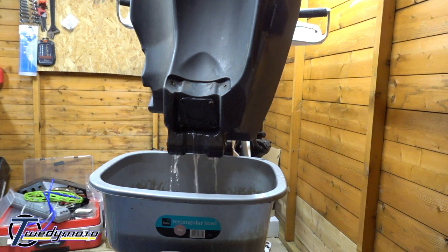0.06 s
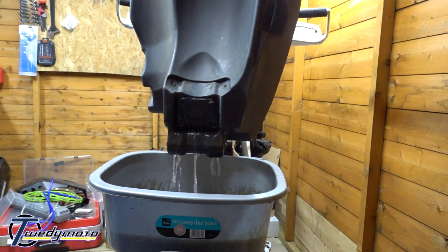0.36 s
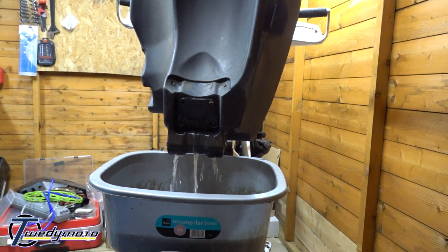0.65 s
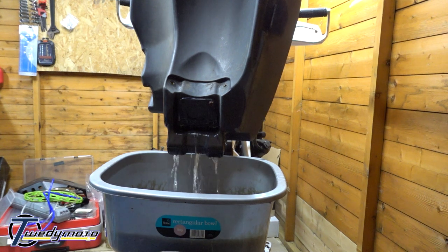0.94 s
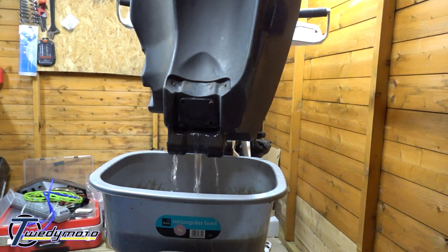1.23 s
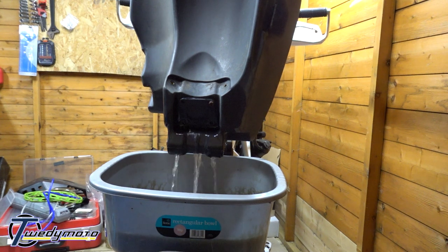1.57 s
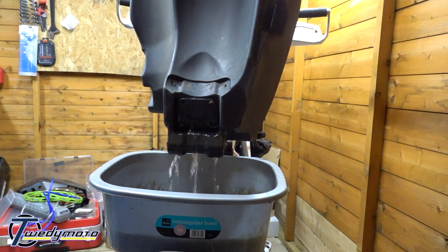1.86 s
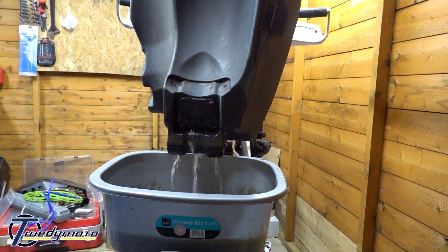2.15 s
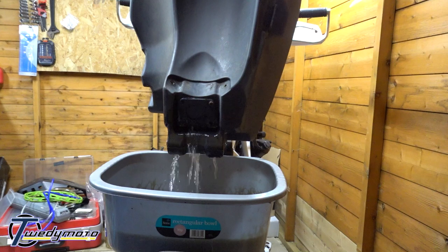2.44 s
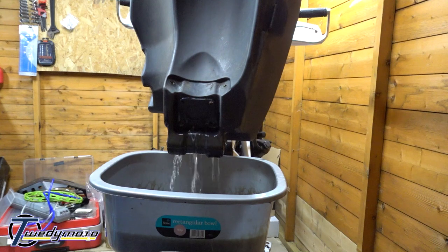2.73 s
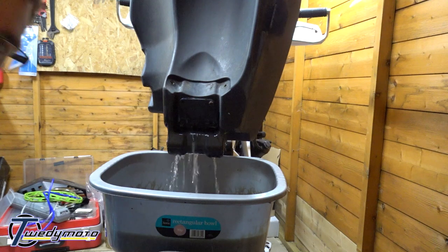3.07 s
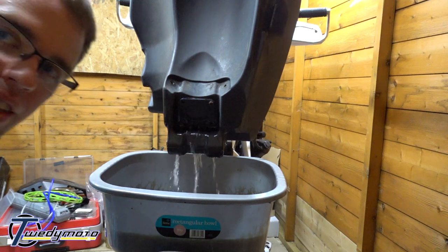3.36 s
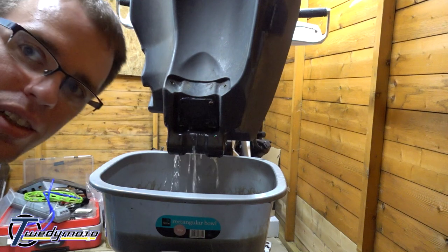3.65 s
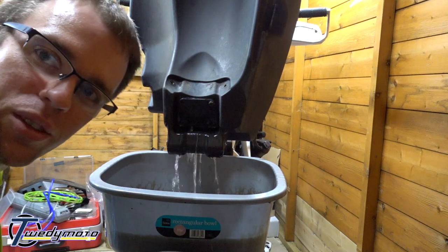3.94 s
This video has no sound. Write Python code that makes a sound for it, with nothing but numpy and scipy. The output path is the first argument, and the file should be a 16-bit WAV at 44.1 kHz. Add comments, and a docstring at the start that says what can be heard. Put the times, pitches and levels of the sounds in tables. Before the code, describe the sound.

Liquid trickles steadily into a plastic tub, with bubbly drips and fine splashing.

```python
"""Trickle into a plastic tub

Thin streams of liquid fall from a tank into a part-filled plastic tub in a wooden shed.
Drops smack the surface and trap bubbles that ring briefly and rise in pitch. Sharp spatters,
tiny bubbles and fine spray fill the gaps. The tub's hollow and the close plank walls ring
after them, over a low electrical hum."""
import sys
import numpy as np
from scipy import signal
from scipy.fft import rfft, irfft
from scipy.io import wavfile

SR = 44100
rng = np.random.default_rng(int(sys.argv[2]) if len(sys.argv) > 2 else 0)


def store_pcm(level_fs):
    """Save levels as 16-bit WAV."""
    pcm = np.round(np.clip(level_fs, -1, 1) * 32767).astype(np.int16)
    wavfile.write(sys.argv[1], SR, np.atleast_2d(pcm).T)


N = 176400

# steady electrical hum: (pitch [Hz], average level [dB])
HUM_TONES = [(100.1, -63.5), (200.2, -81.5)]
# tone of the quiet air: (frequency [Hz], gain [dB])
AIR_TONE = [(20, -16), (55, -9.5), (100, 2.5), (180, -8), (400, -5), (1000, -14.5), (8000, -25)]
# how alike both ears hear scattered sound, 1 or more is identical: (frequency [Hz], likeness [ratio])
EAR_LIKENESS = [(60, 1.2), (250, 0.65), (1200, 0.6), (2200, 0.87), (4000, 0.5), (7000, 0.13),
                (15000, -0.12)]
# how much louder the liquid is on the left: (frequency [Hz], left over right [dB])
LEFT_BIAS = [(250, .2), (1000, 1.1), (2200, 1.5), (8000, 2.4)]
# first echoes off the tub's sides and the nearest wall: (delay [s], gain [dB])
FIRST_ECHOES = [(.0036, -5), (0.0113, -12.5), (0.017, -59)]
# tone of the shed's fading echo: (frequency [Hz], gain [dB])
SHED_TONE = [(200, 1.5), (900, 3), (1700, 0), (3200, -4), (6000, -1.5), (14000, -4.5)]
# length of that echo: (frequency [Hz], time to fade by 60 dB [s])
SHED_FADE = [(200, 0.53), (1500, 0.15), (4000, 0.19), (14000, 0.063)]
# notes of the air in the tub: (pitch [Hz], gain [dB], time to fade by 60 dB [s])
TUB_NOTES = [(425, -3, .15), (697, 0, .22), (838, 6, .17), (1055, -3, .17), (1243, 2, .19), (1738, 7, .22),
             (2662, -5, .15), (2752, -3, .15), (3230, -7, .12)]
# dull knocks on the plastic: (time [s], pitch [Hz], level [dB])
TUB_KNOCKS = [(.797, 75, -47), (0.8, 280, -55), (3.501, 450, -49.5)]
# slow course of the fine splashing: (time [s], level [dB])
FLOW_LEVEL = [(0, -43), (.3, -43.5), (.65, -44), (1.1, -47), (1.5, -45.5), (1.75, -44.5), (2.1, -46),
              (2.8, -45.5), (3.45, -44.5), (4.0, -47)]
# moments when the streams thin out: (time [s], dip [dB])
FLOW_LULLS = [(.51, 2.5), (1.535, 2.5), (2.015, 5), (2.555, 5), (3.717, 4.5)]
# tone of the fine spray: (frequency [Hz], gain [dB])
SPRAY_TONE = [(300, -38), (700, -32), (1300, -15), (3000, -3), (6000, -0.5), (10000, -3), (16000, -8)]
# sharp spatters of droplets: (time [s], centre pitch [Hz], level [dB])
DROP_SPATTERS = [(0.1974, 8920, -39.5), (0.2206, 9230, -46), (0.2894, 9200, -39.0), (0.2939, 5700, -35),
                 (0.3174, 9400, -38), (0.3434, 9100, -38.9), (0.3894, 6200, -31.8), (0.513, 11200, -41),
                 (0.607, 6800, -36), (0.6139, 14500, -41), (0.709, 8600, -36.5), (0.752, 9000, -35),
                 (0.8067, 5300, -36.5), (0.842, 6400, -33), (0.875, 8100, -42), (0.9614, 13000, -39.5),
                 (1.2024, 5700, -35), (1.2537, 5450, -36), (1.4026, 6000, -38), (1.4313, 7600, -35.1),
                 (1.5739, 6700, -34.5), (1.592, 6310, -46), (1.6797, 4580, -34.5), (1.6813, 8030, -31),
                 (1.7286, 6760, -37), (1.7335, 9800, -42.5), (1.7872, 11900, -39.5), (1.7883, 6900, -41),
                 (1.8859, 7350, -35.2), (2.0293, 6340, -37), (2.0753, 4870, -39), (2.2269, 5530, -34.5),
                 (2.2285, 12800, -40), (2.2438, 5800, -35.1), (2.2868, 4800, -36.5), (2.3466, 5400, -30.5),
                 (2.3481, 10900, -43.3), (2.4146, 6900, -36), (2.487, 5600, -37), (2.7666, 7500, -42.5),
                 (3.032, 5960, -37.5), (3.0469, 14500, -39), (3.0672, 5690, -36.5), (3.1233, 9560, -40),
                 (3.1216, 14000, -50), (3.1546, 5260, -32.5), (3.3762, 5690, -33.5), (3.4532, 12000, -41),
                 (3.509, 9200, -34.5), (3.6637, 12000, -40.5), (3.7288, 8000, -36), (3.7564, 7150, -33),
                 (3.977, 12000, -40)]
# typical strength of the small bubbles: (pitch [Hz], level [dB])
SMALL_BUBBLE_LEVEL = [(1100, -53), (1700, -51), (3000, -42), (5000, -45), (8000, -45.5), (12000, -59),
                      (15500, -71)]
# large drops that each trap a clear bubble: (time [s], pitch [Hz], base level [dB])
LARGE_DROPS = [(0.098, 3230, -28), (0.1137, 3210, -29), (0.1237, 2040, -35), (0.1423, 1210, -40.5),
               (0.1894, 3200, -21.5), (0.2, 1313, -34.5), (0.2381, 1810, -31), (0.242, 2810, -28),
               (0.3013, 1950, -34), (0.303, 3130, -25.5), (0.3232, 1395, -29.5), (0.333, 882, -44),
               (0.3761, 1760, -30), (0.405, 430, -53), (0.4278, 4480, -34), (0.438, 1296, -32.5),
               (0.5657, 3270, -22), (0.5774, 4600, -34.5), (0.588, 460, -50.5), (0.628, 865, -45),
               (0.638, 3800, -29.5), (0.6555, 710, -44), (0.7099, 1150, -46), (0.7308, 825, -43.5),
               (0.7533, 1440, -38), (0.7618, 2020, -31.5), (0.773, 2790, -27.5), (0.7965, 1300, -37.5),
               (0.8072, 1750, -39.5), (0.8396, 1070, -38.5), (0.845, 3300, -27), (0.8525, 1097, -38.5),
               (0.8738, 4180, -27), (0.9155, 3680, -23.5), (0.9586, 3610, -30.5), (0.9827, 1235, -38),
               (0.9873, 850, -40.5), (0.987, 3150, -25), (1.04, 870, -43), (1.0581, 2800, -30),
               (1.0796, 1860, -28.5), (1.102, 2480, -33), (1.121, 3680, -32), (1.1417, 3035, -22),
               (1.161, 1127, -38), (1.1731, 3220, -24), (1.1883, 1043, -38.5), (1.2003, 2310, -29.5),
               (1.2194, 3090, -22), (1.243, 1910, -29.5), (1.315, 907, -42.5), (1.3338, 1175, -40),
               (1.3724, 1820, -30.5), (1.3731, 1080, -41.5), (1.4198, 3260, -31.5), (1.4223, 1880, -37),
               (1.433, 1290, -34), (1.4437, 1990, -30.5), (1.5649, 3240, -36), (1.6392, 1230, -59),
               (1.6002, 3260, -23), (1.601, 1268, -33.5), (1.6007, 1845, -25.5), (1.609, 1667, -29.5),
               (1.6963, 1160, -38), (1.7963, 3080, -19), (1.817, 2400, -31), (1.9057, 1740, -35),
               (1.9336, 3130, -27.5), (2.0424, 3200, -30), (2.0755, 3300, -29), (2.0982, 2830, -25.5),
               (2.1172, 835, -40), (2.134, 1270, -37.5), (2.1443, 2180, -29), (2.1501, 1780, -28.5),
               (2.1904, 4300, -38.5), (2.1978, 3170, -35), (2.2793, 1350, -39.5), (2.3805, 3300, -30),
               (2.3953, 2650, -28), (2.407, 1880, -32.5), (2.425, 1060, -45.5), (2.435, 3160, -32),
               (2.495, 1780, -41), (2.501, 2960, -33.5), (2.5682, 1794, -35.5), (2.633, 2960, -47),
               (2.647, 2770, -25.5), (2.68, 1294, -47.5), (2.7293, 1227, -45.5), (2.781, 2650, -24.5),
               (2.8361, 3520, -32), (2.8425, 1710, -45.5), (2.8931, 1255, -35), (2.8969, 1880, -30),
               (2.9298, 4300, -37), (3.0022, 3120, -33), (3.0312, 2000, -30.5), (3.0635, 1950, -29),
               (3.068, 3140, -26.5), (3.1818, 2010, -33.5), (3.1822, 3280, -30), (3.2074, 1250, -37.5),
               (3.2257, 1750, -38.5), (3.2586, 1550, -40), (3.2935, 3730, -39.5), (3.3468, 3795, -30),
               (3.3609, 3320, -45), (3.381, 3350, -28.5), (3.4296, 3900, -32), (3.4611, 3450, -28),
               (3.4861, 4490, -31), (3.4875, 2780, -29), (3.587, 4200, -36), (3.6079, 3010, -27.5),
               (3.63, 1840, -34), (3.7632, 1242, -32.5), (3.813, 1620, -36), (3.8247, 2050, -36),
               (3.8266, 2780, -25.5), (3.8946, 3400, -31.5), (3.955, 3140, -25), (3.96, 1286, -40.5),
               (3.9899, 3550, -25.5)]
# boost added to that base level for the bubble's note: (pitch [Hz], gain [dB])
NOTE_BOOST = [(450, 2.5), (850, 0.5), (1200, 2.5), (1700, 0), (3200, 0.7), (7000, 18.5)]

STREAMS = 4   # landing spots in the tub
EAR_LAG_S = .00003   # typical delay between the ears, as drops land in different places


def from_db(db):
    """Turn decibels into a number to multiply by."""
    return 10 ** (np.asarray(db) / 20)


def unit_level(x):
    """Scale a sound so its average (rms) level is 1."""
    return x / np.sqrt(np.mean(x ** 2) + 1e-20)


def at_hz(points, hz):
    """Read between a table's rows, giving each octave equal room."""
    freqs, values = np.transpose(points)
    return np.interp(np.log(np.maximum(hz, 1)), np.log(freqs), values)


def colour(x, points):
    """Turn lows and highs up or down by a table of (frequency [Hz], gain [dB])."""
    size = 2 * x.shape[-1]
    gain = from_db(at_hz(points, np.fft.rfftfreq(size, 1 / SR)))
    return irfft(rfft(x, size) * gain)[..., :size // 2]


def drift(per_s):
    """Glide to a new random value per_s times a second."""
    targets = rng.standard_normal(N // 100)
    return np.interp(np.arange(N) / SR * per_s, np.arange(len(targets)), targets)


def diffuse(pair):
    """Mix two unrelated sounds into left and right, alike in the bass and unlike in the treble."""
    size = pair.shape[-1]
    alike = np.clip(at_hz(EAR_LIKENESS, np.fft.rfftfreq(size, 1 / SR)), -1, 1)
    mid, side = rfft(pair)
    return irfft(np.sqrt((1 + alike) / 2) * mid + np.sqrt((1 - alike) / 2) * side * [[1], [-1]], size)


def add(out, start_s, sound):
    """Mix a short sound in at the given time."""
    i = int(np.clip(start_s * SR, 0, N - 1))
    out[:, i:i + sound.shape[-1]] += sound[..., :N - i]


def background(drone_hz=115.4, drone_db=-67, air_db=-64.5):
    """Electrical hum, a wavering low tone and quiet air."""
    t = np.arange(N) / SR
    hum = sum(from_db(db) * np.sqrt(2) * np.sin(2 * np.pi * hz * t) for hz, db in HUM_TONES)
    waver = drift(per_s=14.2) + 1j * drift(per_s=14.2)   # shakes both loudness and pitch
    drone = np.real(waver * np.exp(2j * np.pi * drone_hz * t))
    air = colour(diffuse(rng.standard_normal((2, N))), AIR_TONE)
    return hum + from_db(drone_db) * unit_level(drone) + from_db(air_db) * unit_level(air)


def shed_echo(x, onset_s=.005, spread_s=.001):
    """Close surfaces throw back a few echoes, then a short blur that lasts longest in the bass."""
    t = np.arange(SR // 3) / SR
    hz = np.fft.rfftfreq(len(t), 1 / SR)
    noise = rfft(diffuse(rng.standard_normal((2, len(t)))))
    edges_hz = np.geomspace(150, 20000, 13)
    onset = 1 - np.exp(-(t / onset_s) ** 2)
    response = np.zeros((2, len(t)))   # how the shed answers one click
    for low, high in zip(edges_hz, edges_hz[1:]):
        centre = np.sqrt(low * high)
        band = irfft(noise * (hz >= low) * (hz < high), len(t))
        fade = onset * from_db(-60 * t / at_hz(SHED_FADE, centre))
        response += from_db(at_hz(SHED_TONE, centre)) * band * fade / np.sqrt(np.sum(fade ** 2))
    for delay, db in FIRST_ECHOES:
        arrival = delay + spread_s * rng.uniform(-1.027, 1) + EAR_LAG_S * rng.standard_normal(2)
        response[[0, 1], (arrival * SR).astype(int)] += from_db(db)
    return signal.fftconvolve(x, response, axes=1)[:, :N]


def tub_ring(x, gain_db=6):
    """The air in the tub's hollow rings on at its own pitches."""
    mono = x.mean(axis=0) + 1e-18
    out = 0
    for hz, db, fade_s in TUB_NOTES:
        kept = from_db(-60 / (fade_s * SR))   # share of the ring left after each sample
        angle = 2 * np.pi * hz / SR
        feedback = [1, -2 * kept * np.cos(angle), kept * kept]
        out += from_db(db) * signal.lfilter([0, 2 * (1 - kept) * np.sin(angle)], feedback, mono)
    return from_db(gain_db) * out


def knocks(decay_s=.0042):
    """Dull bumps on the plastic that die almost at once."""
    out, t = np.zeros((2, N)), np.arange(SR // 10) / SR
    for start_s, hz, db in TUB_KNOCKS:
        add(out, start_s, from_db(db) * np.exp(-t / decay_s) * np.sin(2 * np.pi * hz * t))
    return out


def flow(half_lull_s=.033):
    """Level of the fine splashing in dB: it wanders slowly and dips when the streams thin out."""
    t = np.arange(N) / SR
    dips = sum(db * np.exp(-((t - time_s) / half_lull_s) ** 2) for time_s, db in FLOW_LULLS)
    return np.interp(t, *np.transpose(FLOW_LEVEL)) - dips


def spray(flow_db, gain_db=-3, drops_per_s=2200, spread_db=3, flutter_db=2.2, surge_db=1):
    """Fine droplets patter as dense clicks in fluttering clumps."""
    sizes = from_db(spread_db * np.minimum(rng.exponential(1, (2, N)), 4))
    signs = rng.choice([-1, 1], (2, N))
    hits = rng.random((2, N)) < drops_per_s / SR
    clumps = from_db(flutter_db * drift(per_s=70) + surge_db * drift(per_s=14))
    patter = colour(diffuse(sizes * signs * hits * clumps), SPRAY_TONE)
    return from_db(flow_db + gain_db) * unit_level(patter)


def splash(hz, octaves, decay_s, rise_s=.0005, grain_db=2.5):
    """Liquid breaks up: grainy noise around one pitch, quick to rise and slower to die."""
    t = np.arange(SR // 16) / SR
    grains = rng.standard_normal((2, len(t))) * from_db(grain_db * rng.standard_normal(len(t)))
    edges_hz = np.minimum([hz / 2 ** octaves, hz * 2 ** octaves], [.4 * SR, .45 * SR])
    band = signal.lfilter(*signal.butter(2, edges_hz, "band", fs=SR), grains)
    return unit_level(band) * (1 - np.exp(-t / rise_s)) * np.exp(-t / decay_s)


def bubble(hz, rise_per_swell=.015, wobble_radians=.42):
    """Trapped air pulses: a slightly unsteady note swells and dies while its pitch rises."""
    ear_shift_s = rng.normal() * EAR_LAG_S / 2 * np.array([[1], [-1]])
    wobble = wobble_radians * np.cumsum(rng.standard_normal(11))
    swell_s = .0012 * (2850 / hz) ** .64   # smaller, higher bubbles are quicker
    t = np.maximum(np.arange(int(10 * swell_s * SR)) / SR + ear_shift_s, 0)
    age = t / swell_s   # loudest at age 1
    phase = 2 * np.pi * hz * t * (1 + rise_per_swell * (age / 2 - 1))
    phase += np.interp(age, np.arange(len(wobble)), wobble)
    pulsing = age * np.exp(1 - age) * np.sin(phase)
    # we hear how fast the pulsing changes; dividing keeps the peak near 1
    return np.diff(pulsing) / (2 * np.sin(np.pi * hz / SR))


def spatters(hiss_db=-.8, ping_db=.5, octaves=.27, decay_s=.01, ping_span_s=.02, pings_each=3):
    """A drop shatters: a short hiss and a fading run of pings from tiny bubbles."""
    pings, hisses = np.zeros((2, N)), np.zeros((2, N))
    for start_s, hz, db in DROP_SPATTERS:
        add(hisses, start_s, from_db(db + hiss_db) * splash(hz, octaves, decay_s))
        for late, detune in rng.random((pings_each, 2)):
            lag_s = ping_span_s * late ** 2
            ping = bubble(hz * 2 ** (octaves * (detune - .5)))
            add(pings, start_s + lag_s, from_db(db + ping_db) * np.exp(-lag_s / decay_s) * ping)
    return pings + diffuse(hisses)


def small_bubbles(swing_db, count=4200, per_s=950, spread_db=4.5):
    """Small bubbles form at random, louder when the spray is; one stereo track per stream."""
    out = np.zeros((STREAMS, 2, N))
    starts = np.cumsum(rng.exponential(1, count)) / per_s
    heights = rng.random(count) ** .7   # more high notes than low
    offsets_db = spread_db * np.minimum(rng.standard_normal(count), 2)
    low, high = SMALL_BUBBLE_LEVEL[0][0], SMALL_BUBBLE_LEVEL[-1][0]
    for k, (start_s, height, offset_db) in enumerate(zip(starts, heights, offsets_db)):
        hz = low * (high / low) ** height
        note = bubble(hz)
        if start_s < N / SR:
            db = at_hz(SMALL_BUBBLE_LEVEL, hz) + offset_db + swing_db[int(start_s * SR)]
            add(out[k % STREAMS], start_s, from_db(db) * note)
    return out


def large_drops(splash_db=-8.5, extras=3, extra_db=-12.5, extra_octaves=1.24, extra_span_s=.022):
    """Each drop smacks the surface and traps a clear bubble, which sheds extra, higher ones."""
    out, splashes = np.zeros((STREAMS, 2, N)), np.zeros((2, N))
    for k, (start_s, hz, db) in enumerate(LARGE_DROPS):
        add(out[k % STREAMS], start_s, from_db(db + at_hz(NOTE_BOOST, hz)) * bubble(hz))
        for late, higher in rng.random((extras, 2)):
            extra = from_db(db + extra_db) * bubble(hz * 2 ** (extra_octaves * higher))
            add(out[(k + 1) % STREAMS], start_s + extra_span_s * late, extra)
        smack = splash(hz * 1.12, octaves=.55, decay_s=.005)
        add(splashes, start_s, from_db(db + splash_db) * smack)
    out[0] += diffuse(splashes)
    return out


def scene():
    """The trickle in its tub, a little left of centre, inside the shed."""
    flow_db = flow()
    streams = large_drops() + small_bubbles(flow_db - flow_db.mean())
    sources = [*streams, spatters() + spray(flow_db) + knocks()]
    liquid = sum(sources)
    echoes = sum(shed_echo(x) for x in sources)   # each landing spot gets its own echoes
    left, right = liquid + tub_ring(liquid) + echoes
    left = colour(left, [(hz, db / 2) for hz, db in LEFT_BIAS])
    right = colour(right, [(hz, -db / 2) for hz, db in LEFT_BIAS])
    return np.array([left, right]) + background()


def record(dry, cutoff_hz=15900):
    """Cut off the very highest treble steeply."""
    return signal.sosfilt(signal.ellip(12, .1, 70, cutoff_hz, fs=SR, output="sos"), dry)


dry = scene()
out = record(dry)
store_pcm(out)
```